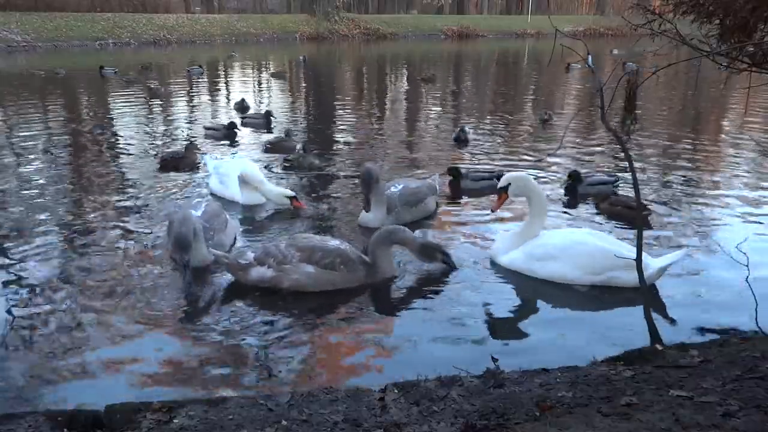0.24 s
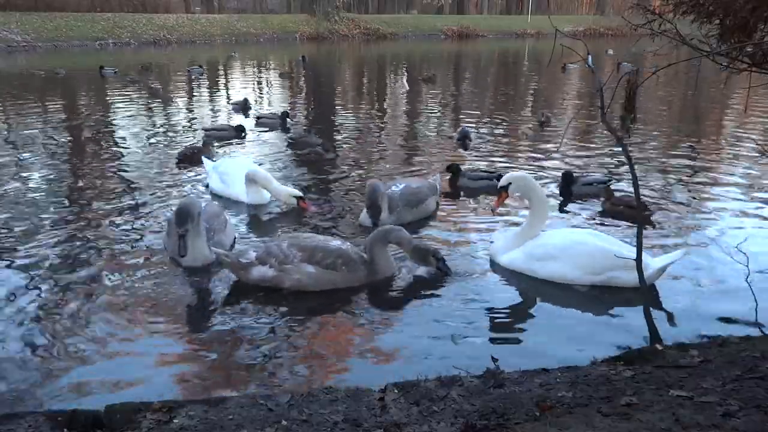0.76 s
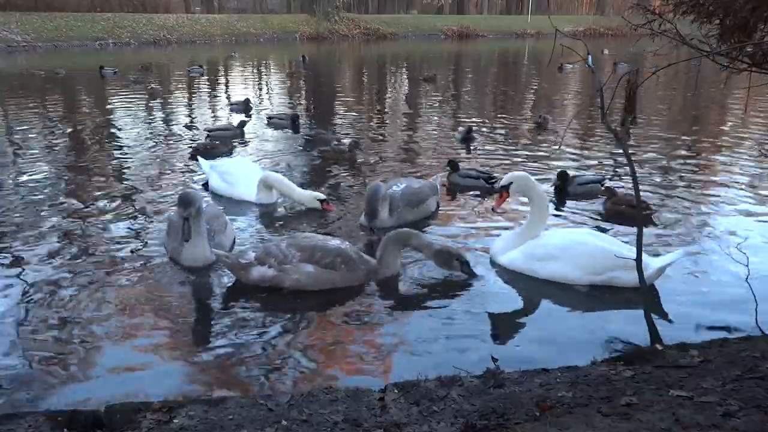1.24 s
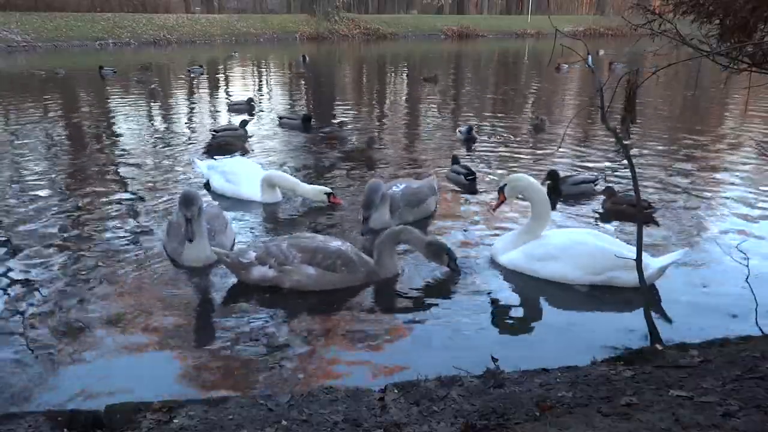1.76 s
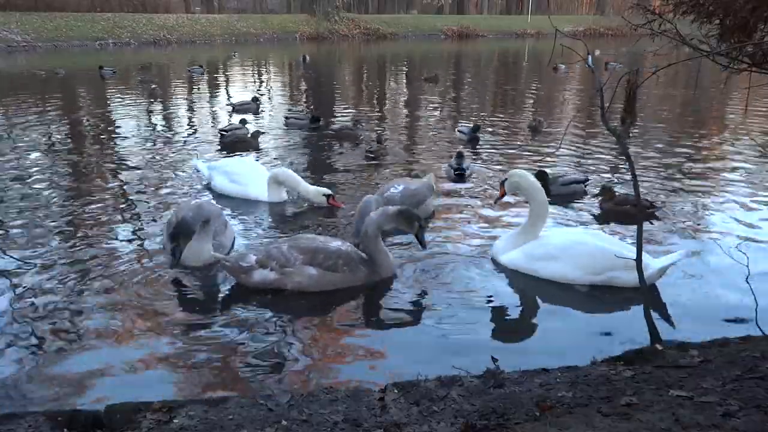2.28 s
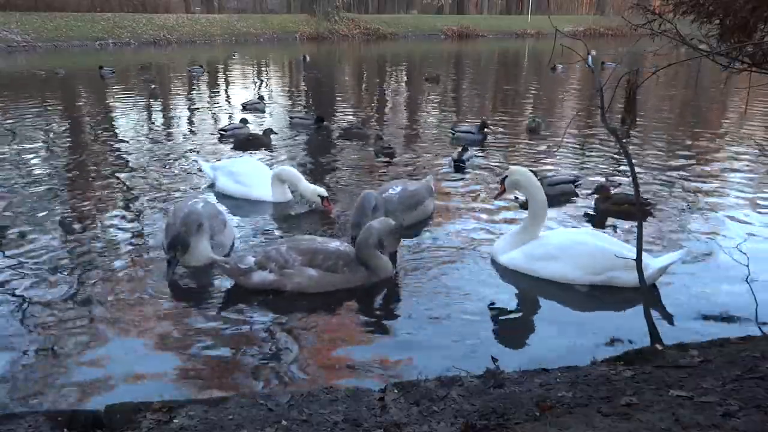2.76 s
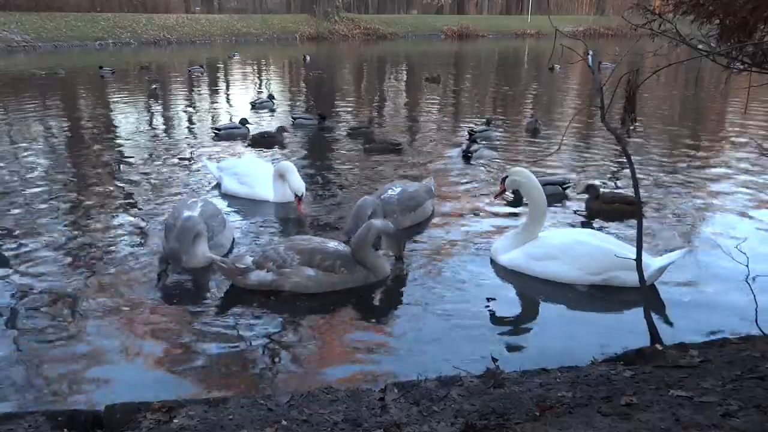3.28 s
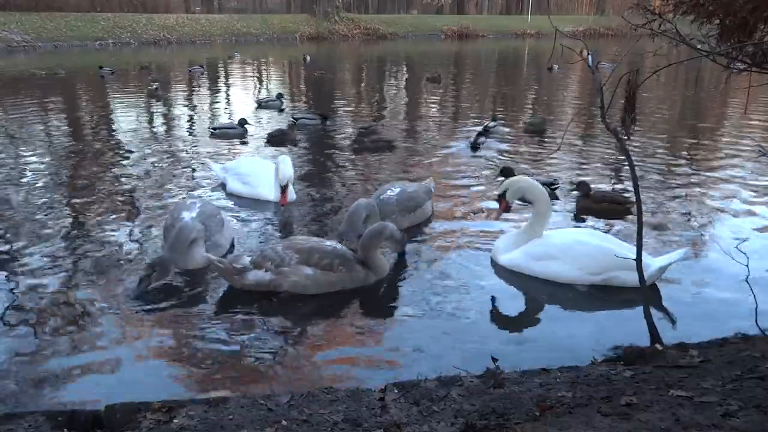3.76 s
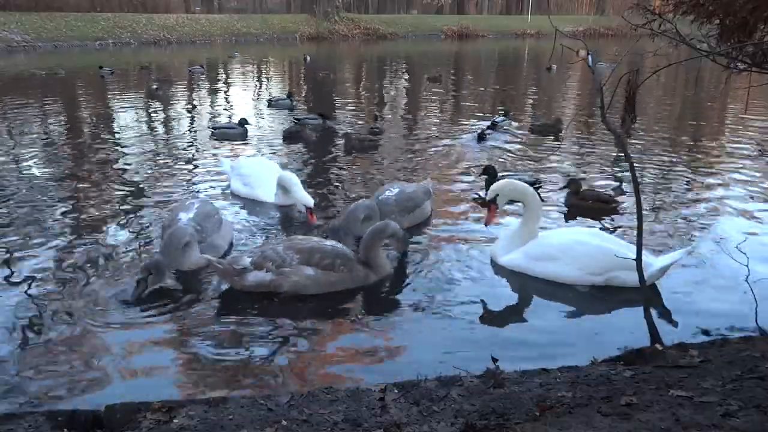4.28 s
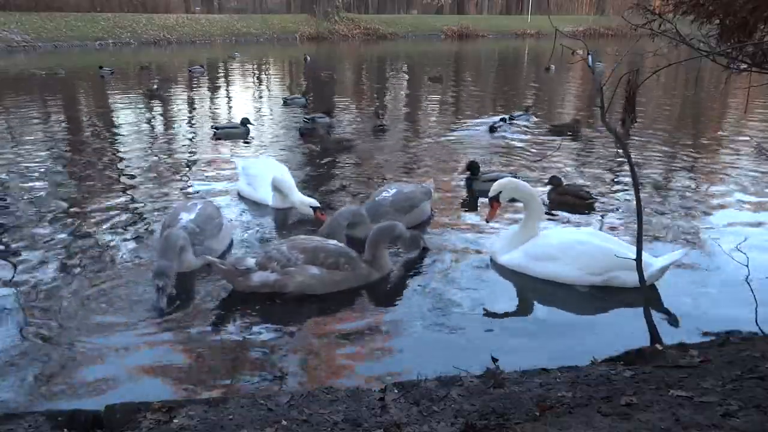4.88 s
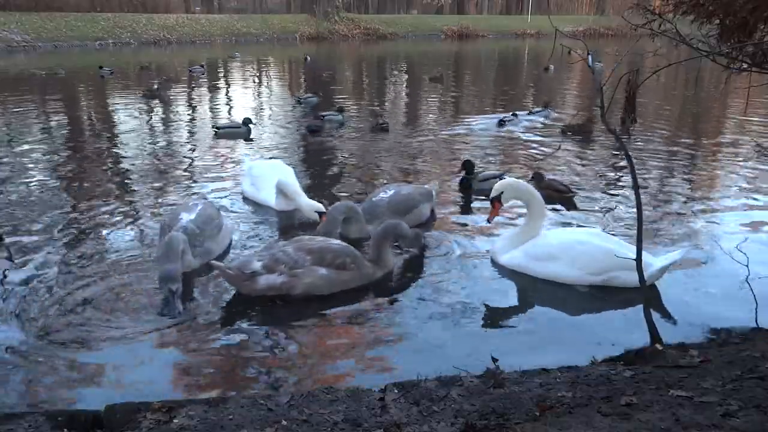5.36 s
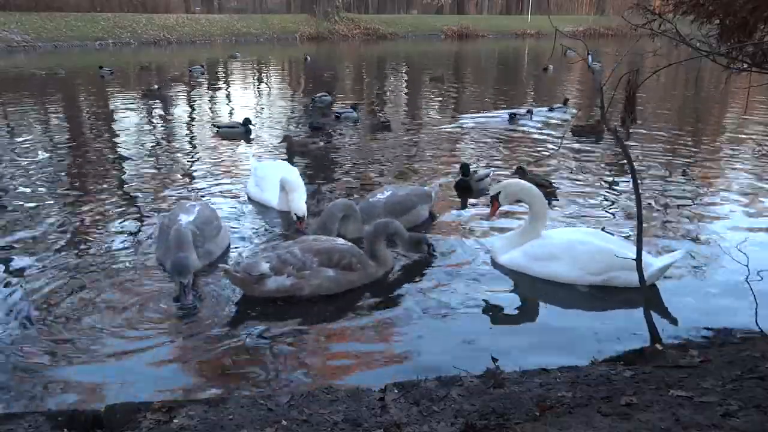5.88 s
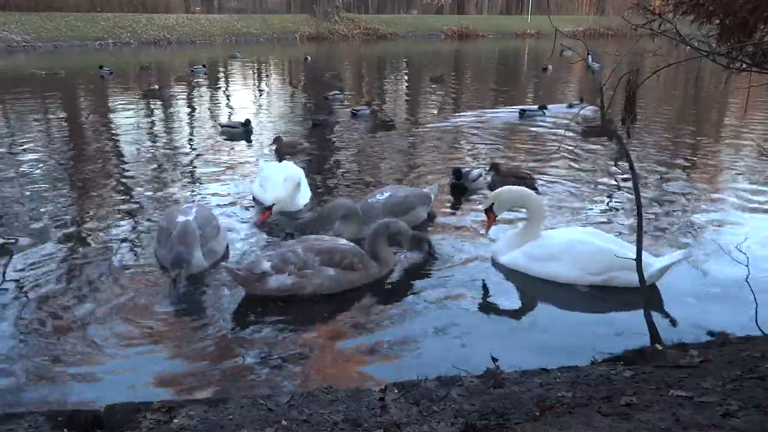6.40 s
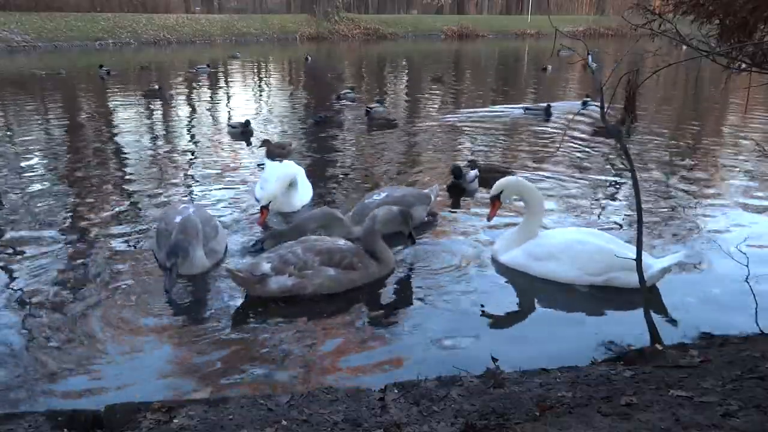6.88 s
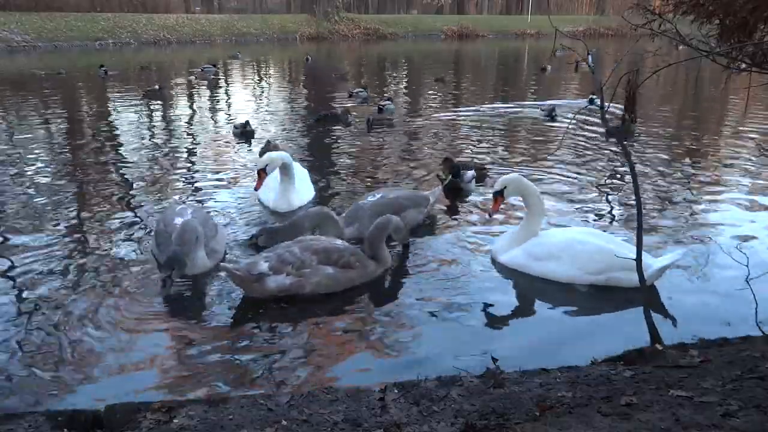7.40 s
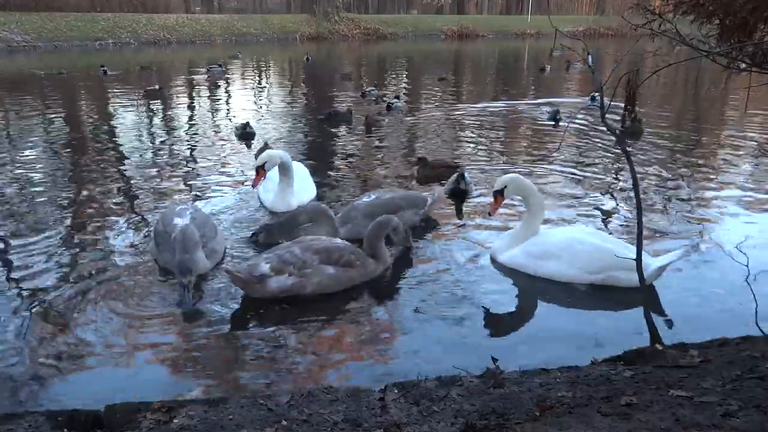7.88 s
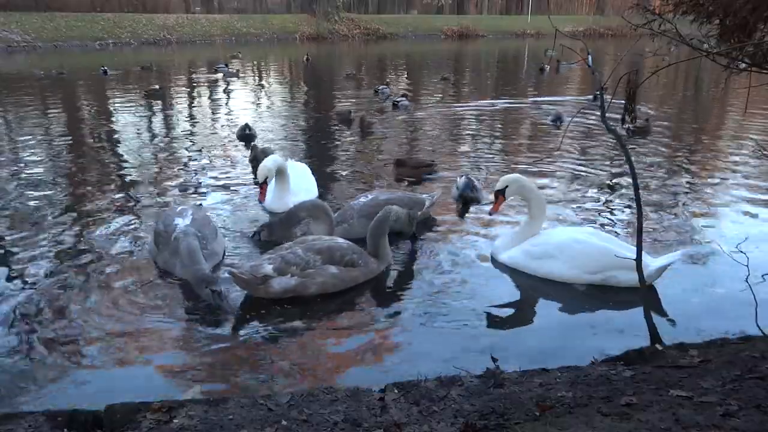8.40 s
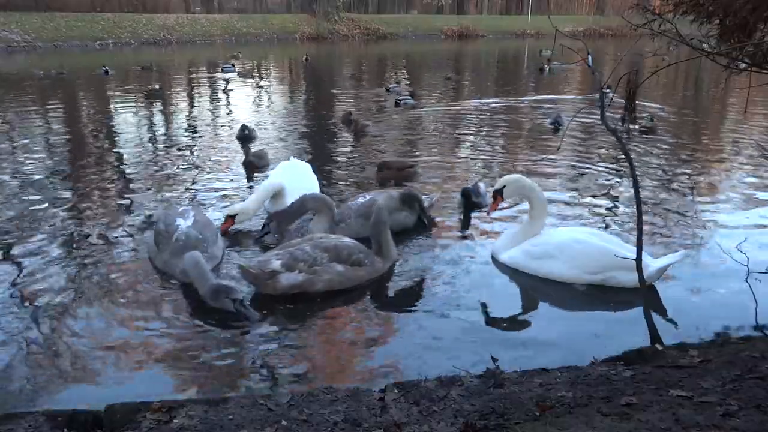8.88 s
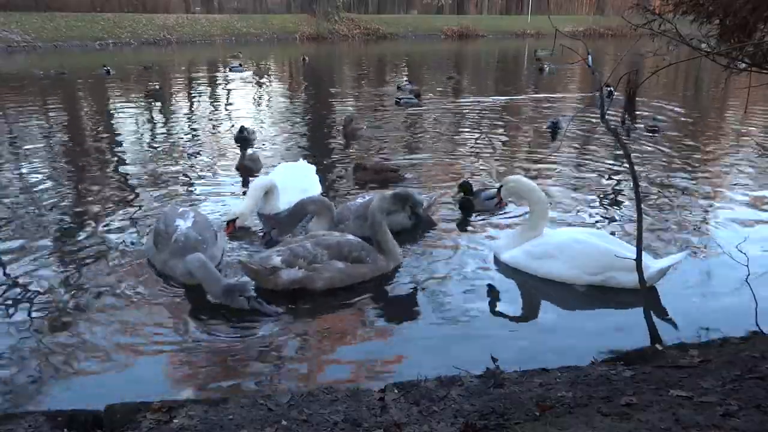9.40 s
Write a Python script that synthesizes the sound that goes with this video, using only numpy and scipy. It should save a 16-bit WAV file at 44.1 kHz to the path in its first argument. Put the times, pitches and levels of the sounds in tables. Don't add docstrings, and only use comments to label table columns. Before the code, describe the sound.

Several swans and ducks feed at the surface of a park pond a few metres away: irregular bill snaps, wet slaps, pecks, small plops and drips over soft rippling. A faint thin whistle from a young swan comes early. Later a close duck, slightly left, gives five nasal quacks, each lower and shorter, while drakes rasp softly far off. Distant traffic hums; small stereo camera, light outdoor echo.

```python
import sys
import numpy as np
from scipy import signal
from scipy.fft import rfft, irfft, next_fast_len
from scipy.io import wavfile
from scipy.ndimage import uniform_filter1d, map_coordinates

SR = 44100
rng = np.random.default_rng(int(sys.argv[2]) if len(sys.argv) > 2 else 0)


def digitize_waveform(pressure):
    field = np.atleast_2d(pressure).T
    bounded = np.clip(field, -1, 1)
    quanta = np.round(bounded * 32767).astype(np.int16)
    wavfile.write(sys.argv[1], SR, quanta)


def how_loud(loudness_db):
    steps = np.asarray(loudness_db, float) / 20
    return 10 ** steps


N = 425565

# start_s, peak_db, bubble_hz
SLAPS = [(0.3334, -24.5, 2610), (.5392, -30.5, 4000), (0.6388, -25.5, 3630), (0.9102, -19.5, 2470),
         (1.2341, -28.5, 4650), (1.32, -29.5, 2340), (1.4772, -28, 4400), (1.5689, -25.5, 4300),
         (2.2833, -23, 7250), (2.532, -24.5, 9000), (2.635, -23.5, 7830), (3.0151, -23, 5700),
         (3.148, -26, 3940), (3.2516, -25, 4080), (3.281, -24, 3170), (3.9114, -25, 3580),
         (3.941, -26, 3510), (4.578, -26, 2200), (4.9273, -28, 2830), (5.1587, -26, 2900),
         (5.5, -26.5, 3240), (5.594, -21, 2720), (5.6906, -17.5, 2550), (5.721, -19.5, 3390),
         (5.7868, -20, 2200), (6.0652, -27.5, 3180), (8.1665, -23.5, 5260), (8.6058, -27, 3070),
         (9.0547, -32.5, 3440), (9.361, -23.5, 3100)]
# start_s, peak_db, bubble_hz
SNAPS = [(0.0142, -22.5, 2950), (0.0965, -25.5, 2290), (0.1672, -24.5, 6400), (.3794, -25.5, 4070),
         (0.4238, -4, 3200), (.4479, -23, 1880), (.7278, -24.5, 2614), (0.796, -16, 4040),
         (.8335, -28, 6400), (1.0087, -23.5, 4500), (1.6342, -23, 4000), (2.7087, -20.5, 6200),
         (4.0749, -21, 3000), (4.148, -16.5, 5850), (4.3665, -24, 3340), (4.8834, -24, 2400),
         (5.2305, -22, 9100), (5.3972, -17, 4400), (5.8809, -5.5, 5640), (5.923, -15, 5270),
         (6.153, -8.5, 3585), (7.003, -29, 3380), (7.5568, -8, 3230), (7.9622, -18.5, 5720),
         (8.0619, -17.5, 5700), (8.3468, -16.5, 3930), (8.6752, -26.5, 2960), (9.1026, -20.5, 8900),
         (9.1791, -11, 8200), (9.568, -14, 4460)]
# start_s, peak_db, bubble_hz
PECKS = [(.0324, -29, 3570), (.1094, -25.5, 3210), (.2878, -29, 3730), (.616, -33, 3780),
         (.7108, -30.5, 7000), (.873, -30, 2890), (1.0476, -28.5, 3150), (1.1194, -27.5, 4020),
         (1.3499, -28, 2260), (1.4117, -28, 6700), (1.7839, -28.5, 4300), (1.9131, -29.5, 2300),
         (2.6055, -25, 6000), (2.6893, -32, 4070), (3.066, -30, 2480), (3.3857, -31, 2940),
         (3.5499, -27, 8200), (3.9824, -28, 2890), (4.2383, -29.5, 6600), (4.6209, -31, 3410),
         (4.9657, -26.5, 2230), (5.0565, -27, 3300), (5.2585, -24.5, 2760), (5.4466, -23.5, 2770),
         (5.6306, -23.5, 2990), (5.9679, -21, 2750), (6.1026, -27, 5100), (7.6869, -24.5, 2940),
         (8.1313, -24, 6270), (9.2637, -24.5, 7560)]
# start_s, peak_db, pitch_hz, t60_s
PLOPS = [(0.446, -27, 1850, 0.036), (2.278, -34, 1530, 0.0206), (3.952, -27.5, 1685, 0.0205),
         (4.934, -33.5, 1320, 0.0205), (5.088, -36, 2100, 0.028), (5.139, -34, 1430, 0.023),
         (5.231, -31, 623, 0.0176), (5.516, -28.5, 1165, 0.014), (5.717, -20, 1270, 0.0068),
         (5.788, -32, 1840, 0.032), (5.815, -35.5, 1560, 0.021), (5.886, -29, 1810, 0.018),
         (6.212, -34, 2047, 0.0264), (8.606, -38.5, 920, 0.028), (8.676, -21.5, 820, 0.0141),
         (8.947, -28, 1340, 0.016), (9.055, -36, 1520, 0.026), (9.201, -36, 866, 0.03),
         (9.232, -40, 710, 0.026), (9.37, -31, 1010, 0.02)]
# time_s, ripple_db
BUSY = [(0, -47), (1.2, -50.5), (1.8, -55), (2.4, -54), (2.7, -52.5), (3.8, -47.5), (5.3, -48),
        (6.3, -47.5), (7.9, -44.5), (8.9, -51.5), (9.65, -48)]
# freq_hz, density_db (per Hz)
RIPPLE = [(600, -28.5), (1500, -0.5), (3000, 3), (6000, -3), (11000, -5), (14000, 4)]
# freq_hz, density_db (per Hz)
TRAFFIC = [(12, -43), (20, -23), (54, -0.5), (81, -2.5), (135, -6.5), (229, -8), (436, -19.5), (679, -19.5),
           (947, -20), (1080, -22.5), (1970, -30), (3000, -43), (4000, -53), (5200, -74.5), (8800, -120)]
# freq_hz, likeness (left-right, 0-1)
ALIKE = [(60, 1), (300, 0.993), (1000, 0.86), (4000, 0.76), (10000, 0.7)]
# start_s, length_s, level_db, throat_stretch (ratio), effort_peak (0-1 of the call)
DRAKES = [
    (5.201, 0.35, -46, 0.85, 0.64),
    (6.166, 0.17, -44.5, .95, 0.69),
    (7.869, 0.31, -43.5, 1.03, 0.32),
    (8.199, 0.23, -43, 0.93, 0.86),
    (8.502, .41, -42, 0.977, .55),
    (9.298, 0.34, -42, 0.94, 0.74),
]
# freq_hz, width_hz, level_db
RASP = [(1600, 340, 1.5), (2170, 180, 4.5), (2837, 160, 0.5), (3500, 260, -15.5)]
# start_s, length_s, top_hz, effort_peak (0-1 of the call), half_cycle_pulse (0-1)
QUACKS = [
    (6.318, 0.28, 249.2, 0.55, 0.98),
    (6.736, 0.23, 227.4, 0.45, 0.8),
    (7.099, 0.19, 208.1, 0.54, 0.82),
    (7.432, .142, 196.1, .6, 0.84),
    (7.735, 0.12, 183.5, 0.62, 0.88),
]
# freq_hz, width_hz, level_db
CHEST = [(403, 61, 3), (1050, 250, 5)]
# freq_hz, width_hz, level_db
THROAT = [(1375, 166, 3), (1640, 720, 2), (2140, 428, 9), (2720, 346, 3), (3200, 280, -5)]
# freq_hz, width_hz, level_db
WINDPIPE = [(2110, 170, -2.5)]
# freq_hz, width_hz, level_db
BILL = [(4070, 410, 0), (5640, 350, 5.5), (6435, 1600, -3.5), (7540, 78, -4), (9100, 6800, -33.5)]
# freq_hz, t60_s
BANKS = [(300, 0.4), (2200, 0.45), (5000, 0.38), (10000, 0.12)]
# freq_hz, level_db
EDGE = [(100, 2), (10900, 3.5), (11150, -10.5), (12500, -53.5), (15000, -55)]

SLAP_SPRAY_DB, SNAP_SPRAY_DB, PECK_SPRAY_DB, SIP_SPRAY_DB = -5, -14.5, -12, -5
SIP_GAP_S, SIP_DB, SIP_SPREAD_DB, SIP_HZ, SIP_OCTAVES = .2, -33, 3, 2300, 1.53
HARD_FROM_DB, DRIER, CRACK_DB, CRACK_S = -22, .3, -9, .0015
TRAFFIC_DB = -37.5
WHISTLE_S, WHISTLE_LENGTH_S, WHISTLE_PEAK_S = 3.26, .3, .045
WHISTLE_HZ, WAVER_HZ, WAVER_PER_S, WAVER_S = 3065, 85, 6.2, .12
WHISTLE_DB, WHISTLE_FADE_DB_PER_S = -48, 50
RASP_HZ, RASP_SWING_HZ = 101.2, 29.91
RASP_FADE_DB, STRETCH_SAG = -10, 0.13
RISE_BEND, FALL_BEND = 2.1, 2.2
START_HZ, REST_HZ = 167.6, 163.4
END_SHARE = .74
QUACK_DB, DB_PER_HZ = -23, 0.0678
EFFORT_DB = 3.5
ATTACK_S, RELEASE_S, EDGE_DB = .03, .02, -7
CHEST_DB, CHEST_SLACK_DB = -14, 2.5
BILL_DB, BILL_DB_PER_HZ, BILL_FROM_HZ = -10.5, 0.35, 218
HOARSE_FROM_HZ, HOARSE_PER_HZ = 230, .013
BRIGHTEN_PER_HZ = 0.011
SPREAD = .012
STEP = 8


def unit(x):
    return x / np.sqrt(np.mean(x ** 2) + 1e-20)


def along(points, hz):
    f, v = np.transpose(points)
    return np.interp(np.log(hz + 1), np.log(f + 1), v)


def wobble(rate, size=N):
    knots = rng.standard_normal(int(size * rate / SR) + 4)
    return map_coordinates(knots, [np.arange(size) * rate / SR])


def jitters(rate, count, size):
    at = np.arange(size) * rate / SR
    knots = rng.standard_normal((count, int(at[-1]) + 2))
    step, part = at.astype(int), at % 1
    return 1.2 * (knots[:, step] * (1 - part) + knots[:, step + 1] * part)


def filtered(x, response):
    m = next_fast_len(N + SR // 2)
    return irfft(rfft(x, m) * response(np.fft.rfftfreq(m, 1 / SR)), m)[..., :N]


def rush(spectrum, patchy_db):
    z = signal.stft(rng.standard_normal((2, N)), nperseg=512)[2]
    patches = uniform_filter1d(rng.standard_normal(z.shape[1:]), 8, 0)
    patches = uniform_filter1d(patches, 6, 1)
    pair = signal.istft(z * how_loud(patchy_db * unit(patches)), nperseg=512)[1][:, :N]

    def mid_side(hz):
        turn = np.arccos(np.clip(along(ALIKE, hz), -1, 1)) / 2
        return how_loud(along(spectrum, hz)) * [np.cos(turn), np.sin(turn)]

    mid, side = filtered(pair, mid_side)
    return unit(np.array([mid + side, mid - side]))


def bubble(hz, t60, t, rise=0.041):
    ring = np.sin(2 * np.pi * hz * t * (1 + rise * t / t60))
    return ring * how_loud(-60 * t / t60) * (1 - np.exp(-t / 0.0001))


def droplets(count=2600):
    draw, t = rng.random((count, 5)), np.arange(300) / SR
    clumps = np.cumsum(how_loud(9 * wobble(22)))
    at = np.searchsorted(clumps, draw[:, 0] * clumps[-1])[:, None] + np.arange(len(t))
    hz = 1400 * 2 ** (3.07 * draw[:, 1:2] ** 1.264)
    strength = how_loud(-3.5 * np.log(draw[:, 2:3] + 0.014))
    grains = strength * bubble(hz, (6 + 18 * draw[:, 3:4] ** 2) / hz, t)
    pan = how_loud(5.1 * (draw[:, 4:] - .5))
    sides = [np.bincount(at.ravel(), (grains * g).ravel(), N + 400)[:N] for g in (pan, 1 / pan)]
    return unit(np.array(sides))


def pond():
    ripple_db = np.interp(np.arange(N) / SR, *np.transpose(BUSY))
    sieving = 2.5 * wobble(14) + 3.5 * wobble(60)
    ripple = how_loud(ripple_db - 3.5 + sieving) * rush(RIPPLE, patchy_db=4.5)
    still = how_loud(-59) * rush(RIPPLE, patchy_db=2)
    drips = how_loud(ripple_db - 4.0) * droplets()
    traffic = how_loud(TRAFFIC_DB) * rush(TRAFFIC, patchy_db=0.94)
    return ripple + still + drips + traffic


def sips():
    draw = rng.random((int(N / SR / SIP_GAP_S), 4))
    at = (np.arange(len(draw)) + .8 * draw[:, 0]) * SIP_GAP_S
    db = SIP_DB + SIP_SPREAD_DB * (2 * draw[:, 1] - 1)
    hz = SIP_HZ * 2 ** (SIP_OCTAVES * draw[:, 2] ** 1.5)
    spray_db = SIP_SPRAY_DB + 6 * (2 * draw[:, 3] - 1)
    return np.c_[at, db, hz, spray_db]


def splash(db, hz, spray_db):
    t = np.arange(SR // 10) / SR
    dry_db = -DRIER * max(db - HARD_FROM_DB, 0)
    life = 0.029 * how_loud(rng.normal(0, 2.6))
    air = rng.standard_normal(len(t) + 1)
    noise = (air[1:] - 0.067 * air[:-1]) * how_loud(3.67 * wobble(540, size=len(t)))
    swell = how_loud(-60 * t / life) * (1 - np.exp(-t / .0015))
    spray = how_loud(spray_db + dry_db - 1) * noise * swell
    cycles = np.clip(-db, 7, 22)
    hit = 1.6 * cycles ** -.25 * bubble(hz, cycles / hz, t) + spray
    hit += how_loud(CRACK_DB - 60 * t / CRACK_S) * air[1:]
    for late, step, size in rng.random((6, 3)):
        drop = bubble(hz * 2 ** (1.6 * step - .8), 17 / hz, t[:600])
        hit[int(late * .6 * life * SR):][:600] += how_loud(dry_db - 8 - 10 * size) * drop
    return hit


def dabbling():
    out, t = np.zeros((2, N + SR)), np.arange(SR // 10) / SR
    kinds = (SLAPS, SLAP_SPRAY_DB), (SNAPS, SNAP_SPRAY_DB), (PECKS, PECK_SPRAY_DB)
    blows = [(*row, spray_db) for rows, spray_db in kinds for row in rows]
    for s, db, hz, spray_db in blows + list(sips()):
        hit = splash(db, hz, spray_db)
        pan_db = rng.normal(0, 2.1) * np.array([[1], [-1]])
        out[:, round(s * SR):][:, :len(t)] += how_loud(db + pan_db) * hit
    for s, db, hz, t60 in PLOPS:
        out[:, round(s * SR):][:, :len(t)] += how_loud(db + 4) * bubble(hz, t60, t, rise=0.181)
    return out[:, :N]


def span(s, length):
    start = round(s * SR)
    t = np.arange(min(N - start, round(length * SR))) / SR
    return start, t, np.clip(np.minimum(t, t[-1] - t) / .01, 0, 1)


def cygnet():
    out = np.zeros(N)
    start, t, gate = span(WHISTLE_S, WHISTLE_LENGTH_S)
    hz = WHISTLE_HZ + WAVER_HZ * np.exp(-t / WAVER_S) * np.sin(2 * np.pi * WAVER_PER_S * t)
    past_peak = t - WHISTLE_PEAK_S
    db = WHISTLE_DB - np.maximum(-150 * past_peak, WHISTLE_FADE_DB_PER_S * past_peak)
    db = db + (3.5 + 14 * t) * wobble(50, size=len(t))
    out[start:start + len(t)] = gate * how_loud(db) * np.sin(2 * np.pi * np.cumsum(hz) / SR)
    return out


def effort(u, top, rise=RISE_BEND, fall=FALL_BEND):
    return np.where(u < top, 1 - abs(1 - u / top) ** rise, 1 - abs((u - top) / (1 - top)) ** fall)


def resonances(modes, f):
    total = 0
    for k, (centre, width, db) in enumerate(modes):
        damping = 1j * f * width
        total = total + (-1) ** k * how_loud(db) * damping / (centre * centre - f * f + damping)
    return total


def steady(shape):
    return shape / np.sqrt((abs(shape) ** 2).sum(axis=0) / 2)


def voiced(shape, phase, share):
    count, size = len(shape), len(phase)
    k = np.arange(1, count + 1)[:, None]
    real, imag = (2 * uniform_filter1d(jitters(300, count, size), size=4, axis=0) for _ in range(2))
    drift = how_loud(2.2 * jitters(22, count, size))
    lines = shape * drift * (np.sqrt(1 - share ** 2) + .7 * share * (real + 1j * imag))
    return (lines * np.exp(1j * k * phase)).real.sum(axis=0)


def drakes():
    out, k = np.zeros(N), np.arange(1, 33)[:, None]
    for s, length, level_db, throat, top in DRAKES:
        start, t, gate = span(s, length)
        push = effort(t / length, top, 1.6, 1.6)
        db = level_db + RASP_FADE_DB * (1 - push)
        rate = RASP_HZ + RASP_SWING_HZ * push
        stretch = throat - STRETCH_SAG * (1 - push)
        phase = 2 * np.pi * np.cumsum(rate * how_loud(.25 * wobble(60, size=len(t)))) / SR
        f = k * rate
        shape = steady(resonances(RASP, f / stretch) / (1 + (1200 / f) ** 4))
        voice = voiced(shape, phase, .5)
        out[start:start + len(t)] += gate * how_loud(db + 1.8 * wobble(50, size=len(t))) * voice
    return out


def quack_shape(k, hz, twin, chest_db, bill_db):
    f, odd = k * hz, k % 2
    surface = 1 - .2 * np.exp(-2j * np.pi * f * .00098)
    neck = f * (215 / hz) ** 0.52
    chest = resonances(CHEST, f * (220 / hz) ** 0.2) * (1 - 0.71 * odd) / (1 + (f / 1150) ** 6)
    twin_pulse = 1 - np.clip(twin, 0, .95) * odd / (1 + (f / 2500) ** 6)
    throat = resonances(THROAT, neck) * surface * twin_pulse
    throat = throat / (1 + (850 / f) ** 6) * (f / 2100) ** (BRIGHTEN_PER_HZ * (hz - 215))
    bill = resonances(BILL, f * (225 / hz) ** 0.088) * surface
    bill = bill * (f < 12500) / (1 + (3200 / f) ** 4)
    flare = 1 + resonances(WINDPIPE, f)
    shape = 0.73 * flare * steady(throat)
    shape = shape + how_loud(chest_db) * steady(chest) + how_loud(bill_db - 2.2) * steady(bill)
    return shape * np.exp(-1j * SPREAD * k ** 2) / np.sqrt(1 + how_loud(2 * bill_db))


def duck():
    out, k = np.zeros(N), np.arange(1, 58)[:, None]
    for s, length, top_hz, top, twin in QUACKS:
        start, t, gate = span(s, length)
        push = effort(t / length, top)
        slack_hz = np.where(t < top * length, START_HZ, max(REST_HZ, END_SHARE * top_hz))
        hz = slack_hz + (top_hz - slack_hz) * push
        edges = np.clip(1 - t / ATTACK_S, 0, 1) + np.clip(1 - (length - t) / RELEASE_S, 0, 1)
        db = QUACK_DB + DB_PER_HZ * (top_hz - REST_HZ) + EDGE_DB * edges + EFFORT_DB * (push - 1)
        bill_db = BILL_DB + BILL_DB_PER_HZ * np.clip(hz - BILL_FROM_HZ, 0, None) - 5 * edges
        chest_db = CHEST_DB + CHEST_SLACK_DB * (1 - push)
        rough = .13 + 6 * (1 - hz / hz.max()) ** 2
        rough = rough + HOARSE_PER_HZ * np.clip(hz - HOARSE_FROM_HZ, 0, None)
        phase = 2 * np.pi * np.cumsum(hz * (1 + .015 * rough * wobble(180, size=len(t)))) / SR
        hz, rough, bill_db, chest_db = (x[::STEP] for x in (hz, rough, bill_db, chest_db))
        shape = quack_shape(k, hz, twin, chest_db, bill_db)
        share = np.clip(rough + (k * hz / 12000) ** 2, 0, 1)
        shape, share = (np.repeat(x, STEP, axis=1)[:, :len(t)] for x in (shape, share))
        voice = voiced(shape, phase, share)
        out[start:start + len(t)] += gate * how_loud(db + .7 * wobble(150, size=len(t))) * voice
    return out


def banks(x):
    hz, t, z = signal.stft(rng.standard_normal((2, SR // 2)), SR, nperseg=256)
    tail = signal.istft(z * how_loud(-60 * t / along(BANKS, hz)[:, None]), SR, nperseg=256)[1]
    late = np.pad(x, (600, 0))[None]
    return signal.fftconvolve(late, tail / np.linalg.norm(tail[0]), axes=1)[:, :N]


def scene():
    near, far, water = duck(), drakes(), dabbling()
    left, right = banks(how_loud(-14) * near + how_loud(-9) * far + how_loud(-20) * water.mean(axis=0))
    echo = np.array([left + .5 * right, left - .5 * right])
    placed = filtered(near, lambda hz: how_loud([[1.2], [-1.2]]) ** (1.54 * hz / (hz + 400)))
    return placed + how_loud(-1) * far + cygnet() + water + echo + pond()


def roll_off(x):
    return signal.sosfilt(signal.butter(12, 12320, fs=SR, output="sos"), x)


def record(dry):
    mix = filtered(dry, lambda hz: how_loud(along(EDGE, hz)))
    return roll_off(mix)


dry = scene()
out = record(dry)
digitize_waveform(out)
```